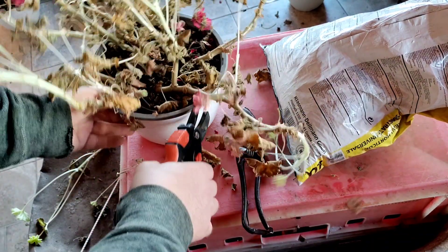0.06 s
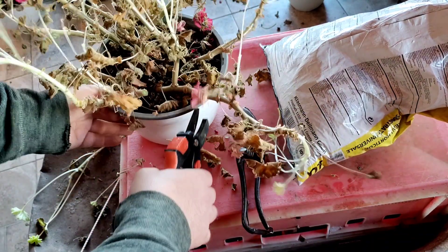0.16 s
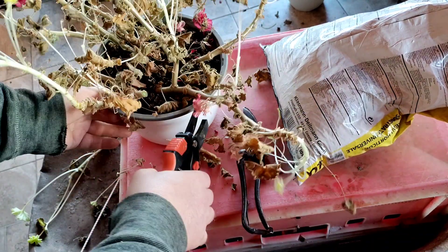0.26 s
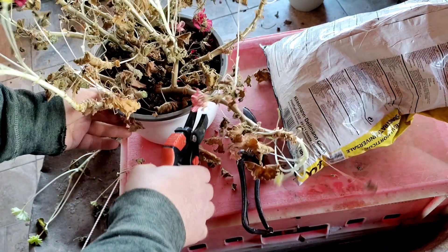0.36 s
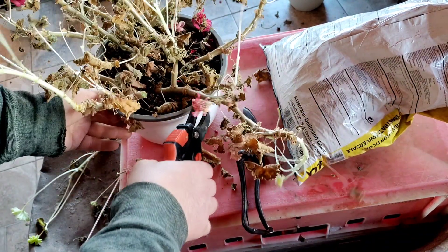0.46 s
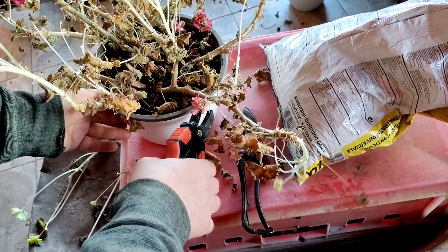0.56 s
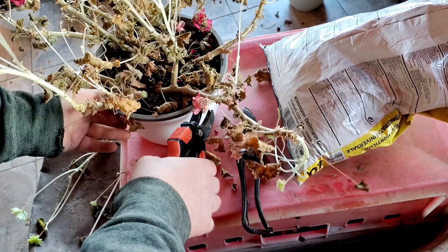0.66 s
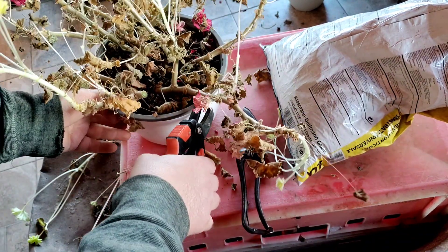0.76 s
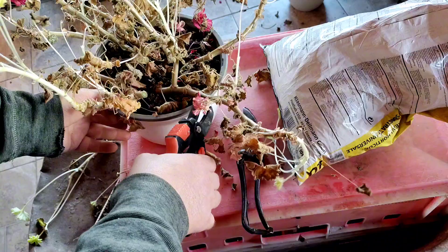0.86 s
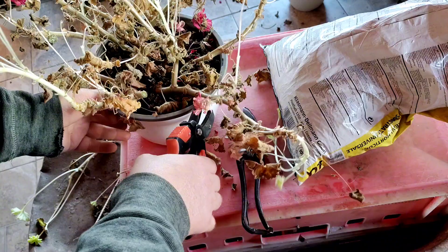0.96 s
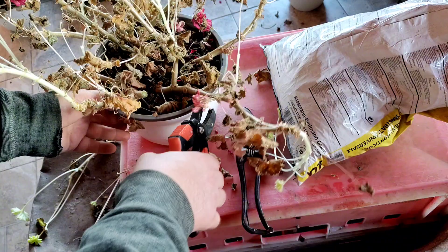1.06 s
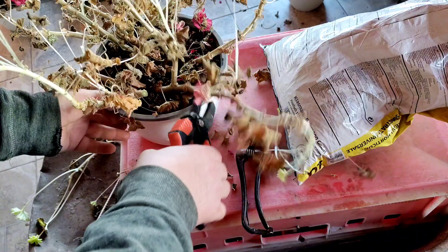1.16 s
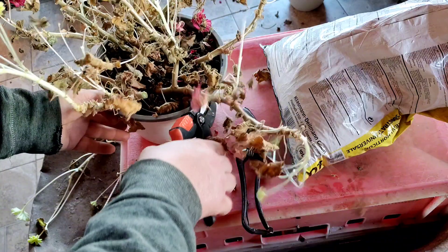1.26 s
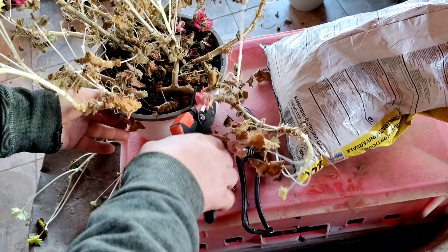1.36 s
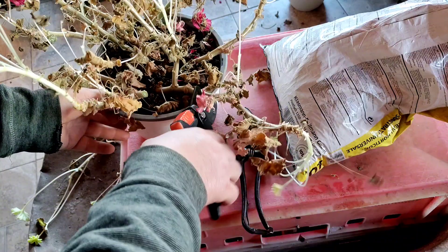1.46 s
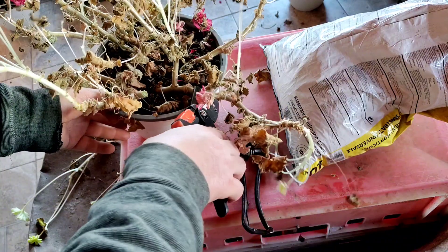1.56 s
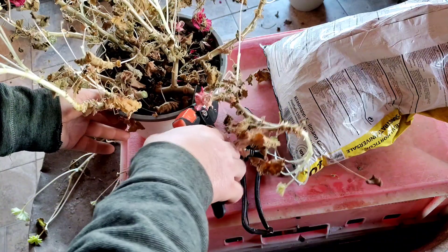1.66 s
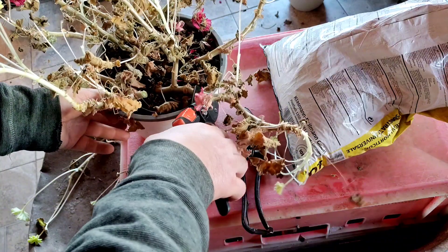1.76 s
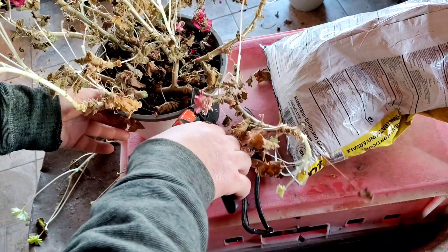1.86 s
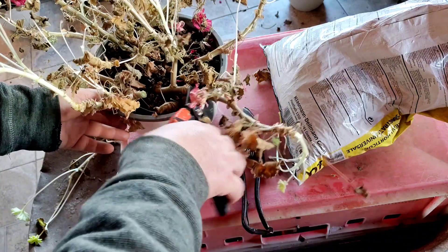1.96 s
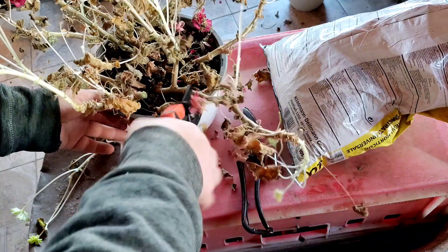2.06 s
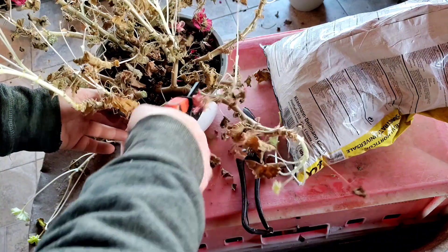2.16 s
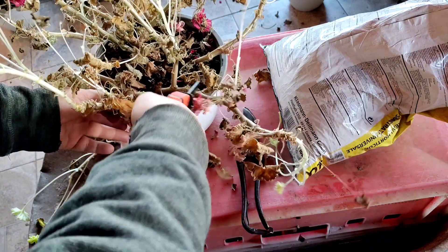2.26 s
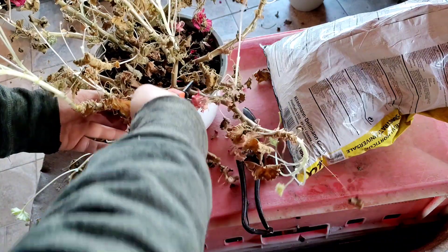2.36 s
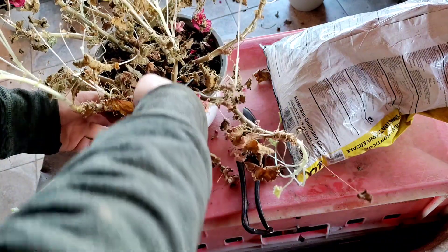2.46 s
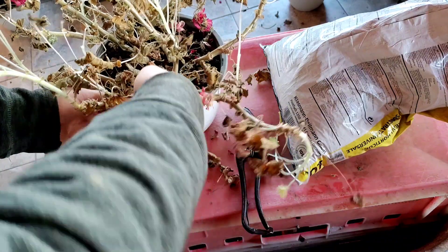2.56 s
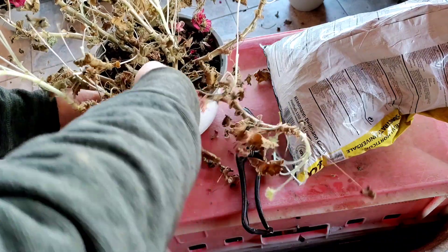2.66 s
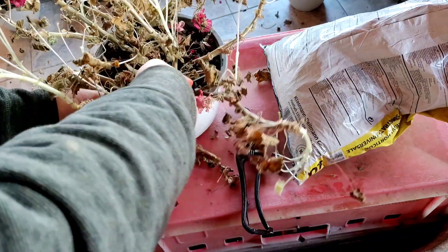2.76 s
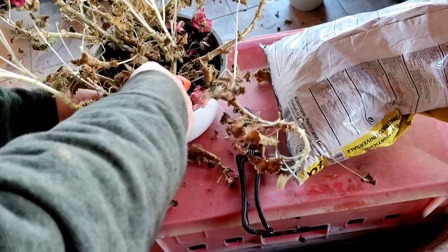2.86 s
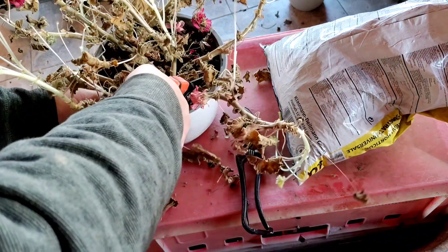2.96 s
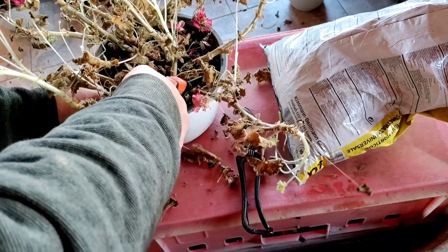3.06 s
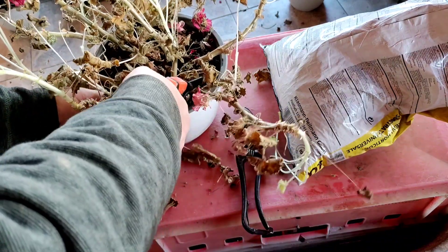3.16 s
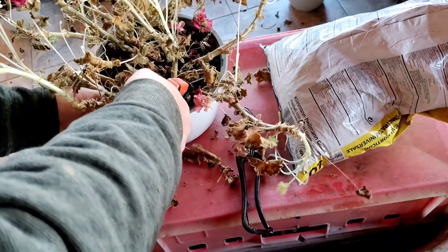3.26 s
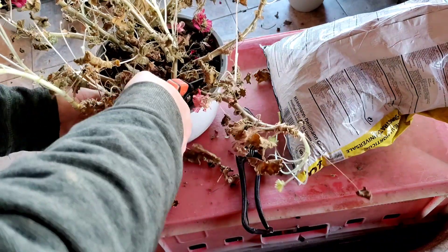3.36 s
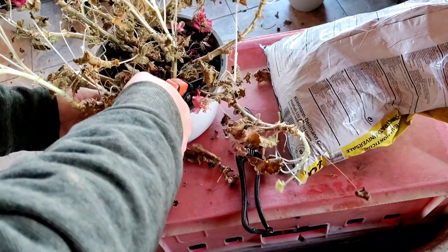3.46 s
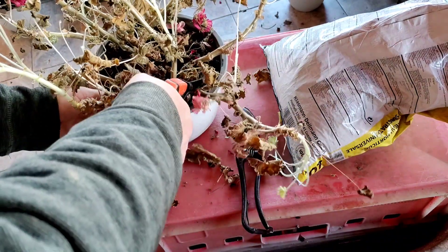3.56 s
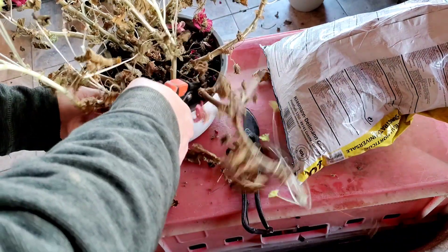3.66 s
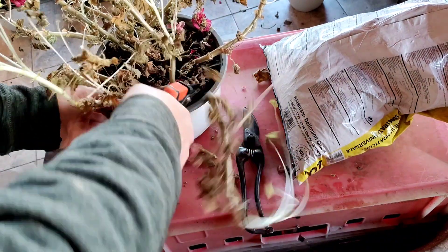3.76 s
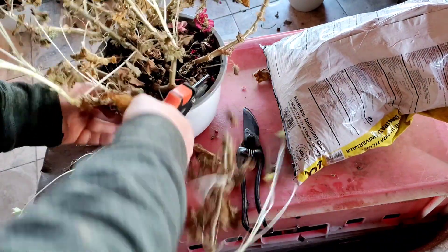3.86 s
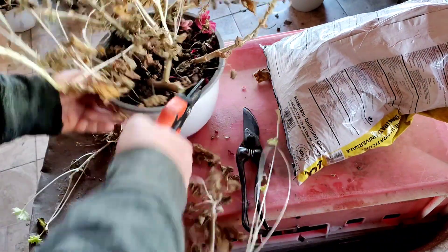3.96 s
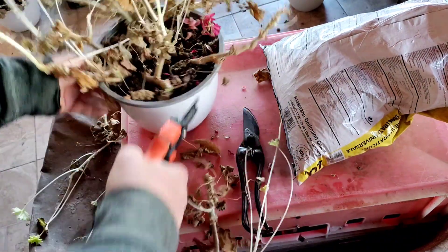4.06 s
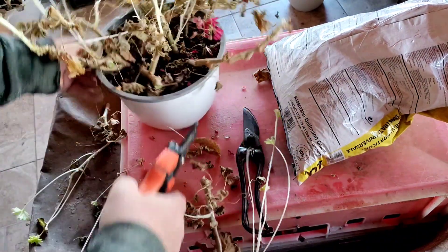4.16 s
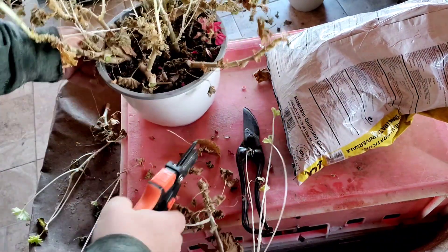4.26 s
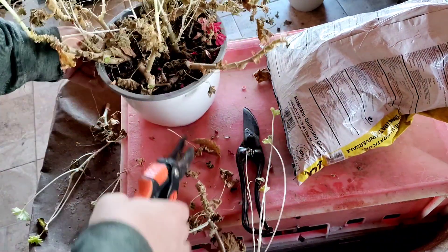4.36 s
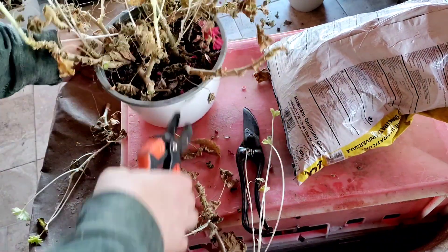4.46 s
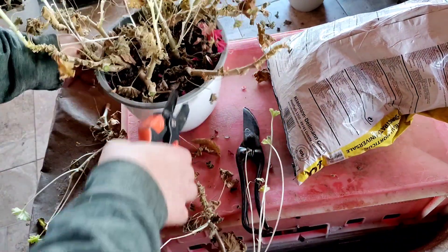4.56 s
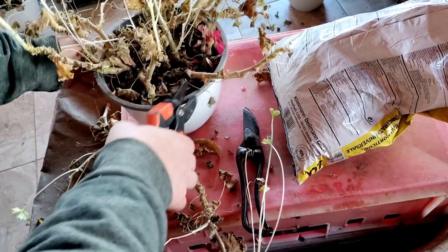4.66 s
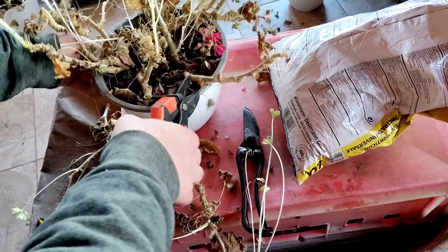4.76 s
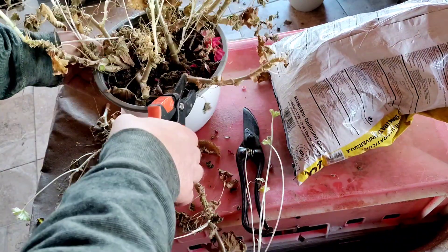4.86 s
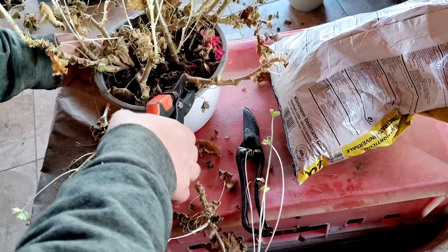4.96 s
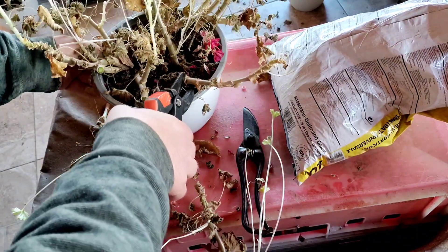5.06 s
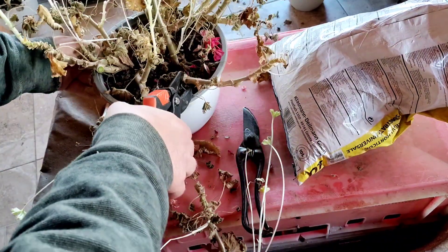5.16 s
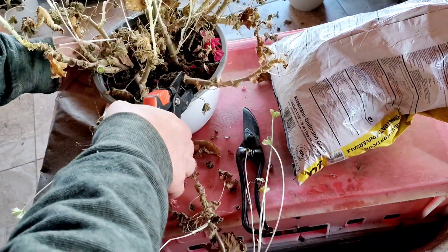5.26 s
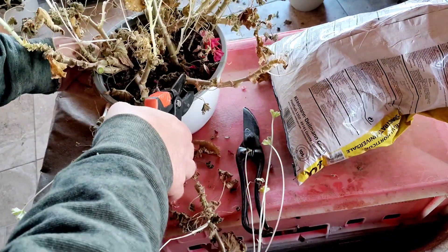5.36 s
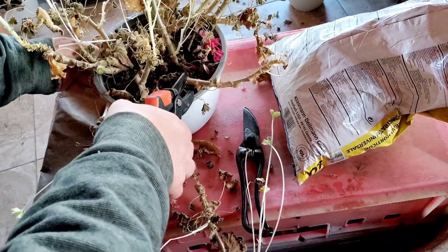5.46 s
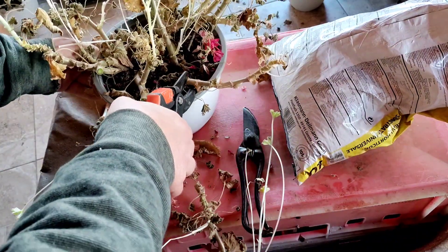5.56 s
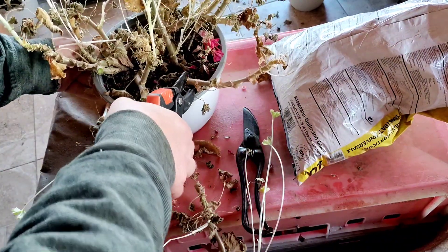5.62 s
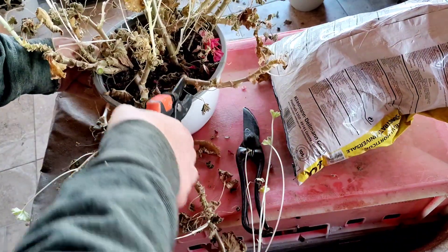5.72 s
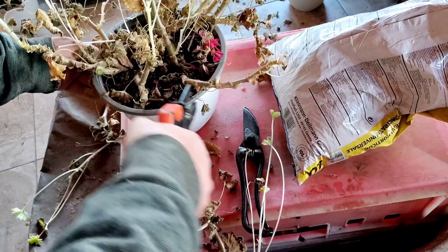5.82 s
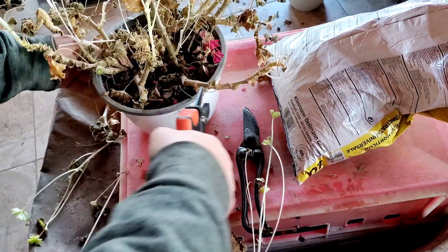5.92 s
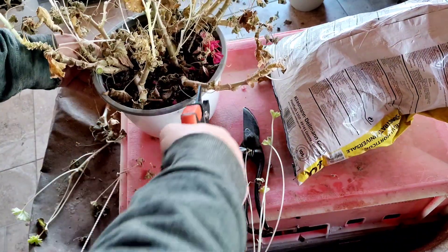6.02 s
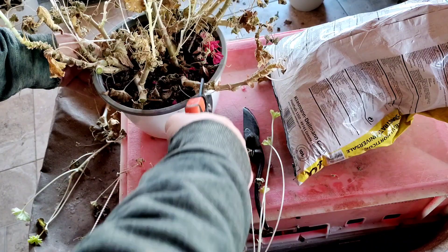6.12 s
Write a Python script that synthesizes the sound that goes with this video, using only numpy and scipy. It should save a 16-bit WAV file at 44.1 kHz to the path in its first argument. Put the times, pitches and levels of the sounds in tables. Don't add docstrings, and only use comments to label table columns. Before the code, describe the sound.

Hand shears cut a dried pot plant. Low knocks boom through the plastic crate beneath, first lightly, then with crisp crackles and brittle foliage. The loudest moment is a sharp steel-and-stem crack followed by dense papery rustle and deep bumps, fading to a few small thumps. Echoing sparrow whistles, faint motor hum and town rumble fill the gaps; the phone's noise reduction roughens the rustle slightly.

```python
import sys
import numpy as np
from scipy import signal
from scipy.fft import rfft, irfft, next_fast_len
from scipy.io import wavfile
from scipy.ndimage import uniform_filter1d

SR = 44100
rng = np.random.default_rng(int(sys.argv[2]) if len(sys.argv) > 2 else 0)


def gain_from_db(level_db):
    decades = np.asarray(level_db, float) / 20
    return 10 ** decades


def put_to_file(sound):
    columns = np.atleast_2d(sound).T
    safe = np.clip(columns, -1, 1)
    whole_steps = np.round(safe * 32767)
    wavfile.write(sys.argv[1], SR, whole_steps.astype(np.int16))


N = 272979

# [t/s, boom peak level/dB, boom f/Hz, dull crack over boom/dB, sharp crack over boom/dB]
KNOCKS = [(1.31, -27, 190.7, -10, -15), (1.669, -30.5, 188.6, -13, -12), (2.01, -35.5, 193.3, -12.5, -12),
          (2.144, -32, 178.7, -14.5, -4.5), (2.361, -62, 196, 3.5, 1.5), (2.524, -18.5, 190.6, -42, -47),
          (2.603, -37.5, 184, -26, -16), (2.689, -31, 190, -25.5, -38), (3.755, -21.5, 195.5, -24, -6.5),
          (3.914, -31, 187.3, -8.5, -6.5), (4.112, -18.5, 280.5, -14, -45), (4.123, -15, 184.4, -19.5, -34),
          (4.145, -30, 141.4, -34, -45), (4.174, -29, 183.6, -34, -39), (4.581, -30, 184.6, -37, -52.5),
          (4.6, -33, 192, -35, -50), (4.693, -27.5, 161, -35, -46), (4.74, -24.5, 162, -8.5, -39),
          (4.907, -37.5, 179, -17, -49), (5.025, -27.5, 176, -27, -35), (5.431, -35.5, 184.3, -51, -53)]
# [t/s, boom peak level/dB, boom f/Hz]
JUDDER = [
    (0.064, -33, 150.4),
    (0.089, -30, 124),
    (0.114, -26.5, 125),
    (0.138, -32.5, 125),
    (0.17, -25.5, 158),
    (0.19, -26.5, 186),
]
JUDDER_T60_S, JUDDER_DULL_DB, JUDDER_SHARP_DB = 0.33, -52, -52
BOOM_T60_S, MOVED_S, MOVED_T60_S = 0.19, 4.0, 0.09
HOLD_S, HOLD_DROP_DB = .043, -6
# [multiple of boom f, level/dB, share of boom t60]
CRATE_MODES = [(1, 3, 1.1), (1.132, -1.5, 0.45), (0.802, -16.5, 4.7), (1.499, -4.5, 0.41),
               (2.25, -9.5, 0.43), (2.9, -14, 0.42), (3.9, -19, 0.29)]
BLADES_S, BLADES_DB = 3.7556, -12
# [t/s, peak level/dB, centre f/Hz, t60/s]
SNAPS = [(1.321, -39, 7500, 0.03), (1.4807, -56, 7200, 0.03), (1.502, -49.5, 7650, 0.043),
         (1.5214, -49, 7750, 0.04), (1.5942, -57, 7500, 0.04), (1.611, -53.5, 7840, 0.04),
         (1.6324, -45.5, 7450, 0.05), (1.757, -42.5, 7850, 0.088), (1.771, -39.5, 8400, 0.062),
         (1.8027, -48, 7850, 0.036), (1.9022, -36, 8700, 0.057), (1.9245, -37.5, 4500, 0.16),
         (1.9602, -35, 8200, 0.05), (1.9982, -34, 3470, 0.023), (2.0357, -46, 11300, 0.02),
         (2.0553, -32, 8160, 0.034), (2.07, -38, 8010, 0.036), (2.154, -50, 3000, 0.018),
         (2.4348, -48, 7240, 0.11), (2.529, -55, 7500, 0.079), (3.636, -56.5, 8000, 0.017),
         (3.6576, -48, 4450, 0.048), (3.689, -43.5, 7270, 0.029), (3.708, -33, 7000, 0.08),
         (3.7284, -31, 7350, 0.088), (3.7507, -15.5, 4405, 0.0066), (3.973, -37, 4600, 0.08),
         (3.995, -31.5, 9000, 0.03), (4.0075, -20.5, 6200, 0.014), (4.037, -27, 4500, 0.015),
         (4.026, -28, 5200, 0.15), (4.0536, -24, 4300, 0.06), (4.066, -38, 3000, 0.04),
         (4.103, -29.5, 4740, 0.13), (4.223, -37, 7560, 0.05), (4.334, -49, 13000, 0.02),
         (4.3428, -31.5, 7650, 0.02), (4.352, -46, 12500, 0.03), (4.4636, -41, 5000, 0.08),
         (4.4756, -38, 7500, 0.03), (4.739, -30.5, 3960, 0.022), (5.431, -55.5, 687, 0.15)]
TICK, TICK_S = .45, .003
# [peak t/s, rise/s, peak level/dB, t60/s]
BRUSHES = [(.022, 0.033, -58.5, 0.091), (.17, 0.42, -57, 0.26), (1.329, 0.044, -54, 0.47),
           (1.519, 0.087, -58.5, 0.31), (1.613, 0.091, -56, 0.65), (1.779, 0.091, -52.5, 1.4),
           (1.927, 0.048, -47.5, 0.97), (2.056, 0.012, -47.5, 0.21), (2.13, 0.22, -59, 0.24),
           (2.775, 0.16, -63.5, 0.3), (3.634, 0.0083, -67, 0.4), (3.698, 0.11, -60.5, .3),
           (3.71, .01, -43, 0.44), (3.752, .02, -38.5, 0.22), (3.972, .015, -42, 1.3),
           (4.009, 0.036, -35.5, 0.41), (4.04, 0.05, -43.5, 0.36), (4.1, 0.35, -41, 0.17),
           (4.17, .05, -58, 0.68), (4.225, 0.01, -51.5, 0.29), (4.34, 0.015, -50.5, 0.47),
           (4.472, 0.023, -58.5, 2.4), (3.85, .08, -58.5, 0.44), (4.75, 0.33, -64, .6)]
# [t/s, twiggy level/dB, woody level/dB, t60/s]
JOLTS = [(1.31, -58.5, -46.5, 0.47), (1.672, -66, -53, 0.31), (2.053, -65, -58, 0.62),
         (2.147, -60, -48, 0.46), (2.358, -79, -62.5, 0.41), (2.433, -72, -71, 0.44),
         (2.527, -55, -44, 0.58), (2.69, -64.5, -57.5, 0.47), (3.708, -50, -44, 0.79),
         (3.754, -50, -37.5, 0.16), (3.918, -56.5, -45, 0.15), (4.112, -51, -36, 0.67),
         (4.343, -62.5, -54.5, 0.64), (4.462, -59, -85, 0.63), (4.739, -49, -42, 0.29),
         (5.028, -70, -53.5, 0.36), (5.43, -107, -72.5, 0.33)]
JOLT_RISE_S, CLATTER_DB, CLATTER_T60_S = .003, 3, 0.13
# [peak t/s, rise/s, twiggy level/dB, woody level/dB, t60/s]
RUBS = [(0.173, 0.39, -60.5, -46.5, 0.36), (1.779, 0.29, -62, -64.5, 0.58),
        (1.927, 0.085, -58.5, -66, 0.58), (2.005, 0.061, -61, -47.5, 0.21), (2.76, 0.24, -63.5, -60, 0.73),
        (3.698, 0.14, -72.5, -63.5, 0.26), (3.965, .02, -56, -56, .3), (4.008, 0.091, -46, -44.5, 0.34),
        (4.07, 0.14, -44, -44.5, 0.28), (1.46, 0.073, -80, -60, 0.37), (4.7, 0.19, -63.5, -50, 0.36),
        (4.77, 0.04, -56.5, -51, 0.4), (4.62, 0.12, -62.5, -79, 0.45), (4.854, 0.12, -65.5, -50.5, 0.53)]
# [f/Hz, level per Hz/dB]
LEAF = [(2350, -54), (4000, -0.5), (4820, -6), (7480, -6.5), (9320, -9), (15400, -10)]
# [f/Hz, level per Hz/dB]
TWIG = [(1500, -27), (2200, -4), (3100, 0.5), (3900, -4), (4500, -17), (5800, -32.5)]
# [f/Hz, level per Hz/dB]
WOOD = [(250, -10.5), (420, -5.5), (800, -8), (1500, -5.5), (2000, -8), (2500, -14.5), (3300, -50)]
# [peak t/s, rise/s, level/dB, t60/s]
SWISH = [
    (.04, .1, -62.5, .4),
    (.15, 0.33, -56.5, 1),
    (.3, 0.55, -62, 0.35),
    (2.434, 0.0053, -55.5, 0.35),
    (2.54, 0.014, -65.5, 0.53),
    (2.773, 0.19, -61, 0.36),
    (4.745, 0.009, -61, 0.43),
]
# [f/Hz, level per Hz/dB]
SWISH_COLOUR = [(2500, -8), (4500, -10.5), (7000, -5.5), (10000, -7), (13000, -21), (16000, -8)]
# [f/Hz, t60/s]
YARD = [(150, 0.12), (600, 0.32), (2000, 0.4), (5000, 0.14), (12000, 0.31)]
YARD_DB = -10.5
# [t/s, high f/Hz, high level/dB, low f/Hz, low level/dB]
SPARROW_CALLS = [
    (0.741, 4320, -59, 3890, -68),
    (2.294, 4220, -64, 3830, -65.5),
    (2.41, 4330, -65, 3607, -60.5),
    (1.551, 4240, -70, 3750, -66),
    (3.047, 4260, -68, 3500, -62),
    (3.28, 4220, -63, 3300, -82),
    (5.007, 4205, -59, 3690, -58.5),
    (5.688, 4420, -68, 4030, -69.5),
    (5.746, 3520, -62, 3120, -60),
]
HIGH_S, HIGH_FALL, LOW_AFTER_S, LOW_S, LOW_FALL = 0.04, 0.039, 0.035, .06, 0.23
# [t/s, length/s, start f/Hz, end f/Hz, level/dB]
STRAYS = [(0.202, 0.15, 2330, 2134, -62.5), (.797, 0.045, 3690, 3680, -70), (.9, 0.029, 3670, 3700, -80),
          (.96, 0.042, 4080, 4000, -77), (.985, 0.052, 3630, 3720, -78.5), (3.268, .07, 4590, 4350, -73),
          (3.305, 0.079, 2860, 2690, -68), (5.02, 0.029, 4740, 4500, -62), (5.07, 0.052, 3250, 2850, -66.5),
          (5.455, 0.038, 2150, 2230, -79), (5.685, 0.021, 4750, 4700, -69.5),
          (5.692, 0.019, 3960, 3910, -61), (5.8, .07, 3150, 2900, -67), (.748, .03, 4350, 3960, -62),
          (6.035, 0.048, 608, 500, -62), (6.072, 0.025, 1150, 1120, -70)]
FAR_T60_S = 0.58
# [t/s, level/dB]
RUMBLE = [(0.0, -52.5), (0.07, -50.5), (0.43, -61.5), (0.83, -61.5), (1.36, -56), (1.86, -60),
          (2.79, -53.5), (2.91, -55.5), (3.36, -54.5), (3.68, -51.5), (4.0, -49.5), (4.3, -44.5),
          (4.5, -52), (4.72, -46), (5.77, -59.5), (6.19, -59.5)]
# [f/Hz, level per Hz/dB]
CRATE = [(62, -60.5), (105, -19), (150, 2.5), (205, 2), (274, -5.5), (405, -28), (700, -52), (1000, -85)]
AFTER_DB, AFTER_T60_S = -21, 0.58
# [f/Hz, level per Hz/dB]
TOWN = [(12, -46.5), (20, -6.5), (43, -13.5), (62, -12.5), (80, 4), (97, -4), (110, -5), (140, -45.5),
        (240, -120)]
TOWN_DB = -62
# [peak t/s, rise/s, level/dB, t60/s]
HUMS = [(.3, 0.31, -63, 0.96), (.7, 0.34, -78, 0.27), (1.13, 0.28, -79, 1.1), (1.6, 0.12, -70, 1.3),
        (2.05, 0.3, -77, 0.9), (2.6, 0.15, -61, .8), (3.25, 0.32, -91, 0.87), (3.46, 0.18, -67, 0.31),
        (3.8, 0.16, -67.5, 1.6), (4.25, 1.5, -60, 1.7), (4.8, 0.45, -62.5, 1.14), (5.65, 0.66, -75.5, 0.26),
        (6.06, 0.25, -81, 0.65)]
# [f/Hz, level per Hz/dB]
HISS = [(350, -25), (600, -6), (812, -5), (1370, -6), (2240, -7.5), (3250, -9), (14100, -15), (16000, -37)]
HISS_DB = -78.5
DIP_S, DIP_HALF_WIDTH_S, DIP_DB = .668, 0.016, -9
# [f/Hz, correlation]
LIKENESS = [(40, 0.88), (130, 0.94), (290, 0.85), (640, 0.17), (1400, 0.0045), (3000, 0.041)]
# [f/Hz, left over right level/dB]
PORTS = [(60, 1.5), (130, -1), (290, 0), (640, 1.5), (1410, -1.5), (3100, -5), (6820, 10.5), (15000, 1)]
PORT_LAG = 5


def knocks():
    boom, crack = np.zeros((1, N)), np.zeros((1, N))
    t = np.arange(SR // 2) / SR
    luck = rng.standard_normal((len(blows()), len(CRATE_MODES), 2))
    grit = rng.standard_normal((len(blows()), SR // 2))
    dull = signal.butter(2, [400, 2000], "band", fs=SR, output="sos")
    sharp = signal.butter(3, [1900, 3900], "band", fs=SR, output="sos")
    swing = (1 - np.exp(-t / 0.0023)) * gain_from_db(HOLD_DROP_DB / (1 + np.exp((HOLD_S - t) / 0.0019)))
    for (s, db, hz, t60, dull_db, sharp_db), chance, noise in zip(blows(), luck, grit):
        ringing = 0
        for (multiple, mode_db, share), (level_luck, pitch_luck) in zip(CRATE_MODES, chance):
            decay = gain_from_db(mode_db + 2 * level_luck - 60 * t / (share * np.clip(t60, .03, .4)))
            mode_hz = hz * multiple * (1 + 0.01 * pitch_luck)
            ringing = ringing + decay * np.sin(2 * np.pi * mode_hz * t)
        ringing = ringing * swing
        add(boom, -gain_from_db(db) * ringing[None] / np.abs(ringing).max(), s)
        contact = noise * (gain_from_db(-60 * t / 0.007) + gain_from_db(-11.5 - 60 * t / 0.17))
        contact[:6] -= 9.0
        for band, over_db in ((dull, dull_db + 15.0), (sharp, sharp_db + 12.0)):
            part = signal.sosfilt(band, contact)
            add(crack, gain_from_db(db + over_db) * part[None] / np.abs(part).max(), s)
    return signal.sosfilt(signal.butter(4, 100, "high", fs=SR, output="sos"), boom), crack


def blows():
    judder = [(s, db, hz, JUDDER_T60_S, JUDDER_DULL_DB, JUDDER_SHARP_DB) for s, db, hz in JUDDER]
    bumps = [(s, db, hz, BOOM_T60_S if s < MOVED_S else MOVED_T60_S, *cracks)
             for s, db, hz, *cracks in KNOCKS]
    return judder + bumps


def blades():
    out, t = np.zeros((1, N)), np.arange(SR // 100) / SR
    pulse = -np.sin(2 * np.pi * 1500 * t) * np.exp(-t / .00035)
    add(out, gain_from_db(BLADES_DB) * pulse[None] / np.abs(pulse).max(), BLADES_S)
    return out


def snaps():
    out, t = np.zeros((2, N)), np.arange(SR // 5) / SR
    grit = rng.standard_normal((len(SNAPS), 3, len(t)))
    for (s, db, hz, t60), noise in zip(SNAPS, grit):
        pair = noise[0] + 3.6 * noise[1:]
        low, high = hz / 3.4, min(hz * 2, .45 * SR)
        tear = rms_one(signal.sosfilt(signal.butter(3, [low, high], "band", fs=SR, output="sos"), pair))
        tick = TICK * (high / SR * 2) ** 2 * np.diff(pair, prepend=0) * np.exp(-t / TICK_S)
        decay = gain_from_db(-60 * t / np.clip(t60, .005, .2))
        add(out, gain_from_db(db - 7.0) * (tear + tick) * decay, s)
    return out


def leaves():
    papery = coloured(crackle(1800, spread_db=3.5, clump_db=1.5, apart=2.7), LEAF)
    twiggy = coloured(crackle(2700, spread_db=2.0, clump_db=0.5, apart=1.0), TWIG)
    woody = coloured(crackle(1500, spread_db=1.0, clump_db=1.0, apart=0.7), WOOD)
    brushed = gain_from_db(-0.5) * swells(BRUSHES) * papery
    return brushed + gain_from_db(4) * stems(0) * twiggy + gain_from_db(-1.0) * stems(1) * woody


def crackle(per_s, spread_db, clump_db, apart):
    born = rng.random((3, N)) < per_s / SR
    sizes = gain_from_db(spread_db * np.minimum(rng.exponential(1, (3, N)), 4))
    sizes = sizes * rng.choice([-1, 1], (3, N))
    grains = rms_one(born * sizes) + 0.67 * rng.standard_normal((3, N))
    return rms_one(grains[0] + apart * grains[1:]) * gain_from_db(clump_db * drift(35))


def stems(layer):
    rubs = [(s, rise, dbs[layer], t60) for s, rise, *dbs, t60 in RUBS]
    rattles = [(s, JOLT_RISE_S, dbs[layer], t60) for s, *dbs, t60 in JOLTS]
    clatter = [(s, JOLT_RISE_S, dbs[layer] + CLATTER_DB, CLATTER_T60_S) for s, *dbs, _ in JOLTS]
    return swells(rubs + rattles + clatter)


def swish():
    return swells(SWISH) * wide_noise(SWISH_COLOUR)


def echoes(x, t60_table, build_s):
    t = np.arange(SR) / SR
    white, tail = rng.standard_normal((2, SR)), 0
    for low in 80 * 2. ** np.arange(8):
        band = signal.sosfilt(signal.butter(2, [low, 2 * low], "band", fs=SR, output="sos"), white)
        decay = gain_from_db(-60 * t / at_hz(t60_table, low * 1.12))
        tail = tail + band * decay * (1 - np.exp(-t / build_s))
    tail /= np.sqrt(np.sum(tail ** 2, axis=1, keepdims=True))
    return signal.fftconvolve(np.broadcast_to(x, (2, N)), tail, axes=1)[:, :N]


def sparrows():
    out, waver = np.zeros((1, N)), drift(160)
    for s, length, from_hz, to_hz, db in notes():
        part = np.arange(round(length * SR)) / (length * SR)
        warble = 1 + .028 * waver[int(s * SR):][:len(part)]
        hz = (from_hz + (to_hz - from_hz) * part) * warble
        breath = np.sin(np.pi * np.sqrt(part))
        whistle = breath * np.sin(2 * np.pi * np.cumsum(hz) / SR)
        add(out, gain_from_db(db + 2.5) * whistle[None], s)
    return 0.31 * out + echoes(out, [(1000, FAR_T60_S), (8000, FAR_T60_S * 0.6)], build_s=0.0032)


def notes():
    high = [(s, HIGH_S, hz, hz * (1 - HIGH_FALL), db) for s, hz, db, _, _ in SPARROW_CALLS]
    low = [(s + LOW_AFTER_S, LOW_S, hz, hz * (1 - LOW_FALL), db) for s, _, _, hz, db in SPARROW_CALLS]
    return STRAYS + high + low


def background():
    db, = in_time(RUMBLE)
    lingering = swells([(s + 0.039, .06, top + AFTER_DB, AFTER_T60_S) for s, top, *_ in blows()])
    level = np.hypot(gain_from_db(db), lingering)
    rumble = level * gain_from_db(2.4 * drift(6.2)) * wide_noise(CRATE)
    town = gain_from_db(TOWN_DB - 4.0) * (level / np.median(level)) ** 0.88 * wide_noise(TOWN)
    motor = wide_noise([(400, -47.5), (460, -3.5), (495, -5.0), (535, -9.0), (640, -56.5)])
    hum = swells(HUMS) * motor
    hiss = gain_from_db(HISS_DB) * wide_noise(HISS)
    dip = gain_from_db(DIP_DB * np.exp(-((np.arange(N) / SR - DIP_S) / DIP_HALF_WIDTH_S) ** 2))
    return dip * (rumble + town + hum + hiss)


def wide_noise(spectrum):
    size = next_fast_len(N)
    mid, side = rfft(rng.standard_normal((2, size)))
    alike = np.clip(at_hz(LIKENESS, np.fft.rfftfreq(size, 1 / SR)), -1, 1)
    pair = np.sqrt(1 + alike) * mid + np.sqrt(1 - alike) * side * [[1], [-1]]
    return coloured(irfft(pair, size)[:, :N], spectrum)


def swells(rows):
    t, power = np.arange(0, N + 16, 16) / SR, 0
    for s, rise, db, t60 in rows:
        growing = 30 * (s - t) / max(rise, .002)
        dying = 60 * (t - s) / max(t60, .02)
        power = power + gain_from_db(db - np.maximum(growing, dying)) ** 2
    return np.interp(np.arange(N) / SR, t, np.sqrt(power))


def drift(rate):
    r = np.exp(-80 * np.pi * rate / SR)
    slow = signal.lfilter([1], [1, -2 * r, r * r], rng.standard_normal(N // 40 + 2002))[2000:]
    return np.interp(np.arange(N) / 40, np.arange(len(slow)), rms_one(slow))


def coloured(x, spectrum):
    size = next_fast_len(N)
    gain = gain_from_db(at_hz(spectrum, np.fft.rfftfreq(size, 1 / SR)))
    return rms_one(irfft(rfft(x, size) * gain, size)[..., :N])


def at_hz(points, hz):
    point_hz, value = np.transpose(points)
    return np.interp(np.log(np.maximum(hz, 1)), np.log(point_hz), value)


def in_time(rows):
    s, *columns = np.transpose(rows)
    return [np.interp(np.arange(N) / SR, s, c) for c in columns]


def rms_one(x):
    return x / np.sqrt(np.mean(x ** 2) + 1e-20)


def add(out, x, s):
    i = max(round(s * SR), 0)
    out[:, i:i + x.shape[1]] += x[:, :N - i]


def at_ports(x):
    size = next_fast_len(N)
    hz = np.fft.rfftfreq(size, 1 / SR)
    half_db = at_hz(PORTS, hz) / 2
    tilt = gain_from_db(np.array([half_db, -half_db]))
    late = np.exp(-2j * np.pi * hz * PORT_LAG / SR * np.array([[0], [1]]))
    return irfft(rfft(x, size) * tilt * late, size)[:, :N]


def scene():
    boom, crack = knocks()
    crack = signal.sosfilt(signal.butter(2, 150, "high", fs=SR, output="sos"), crack + blades())
    breaks = snaps()
    struck = crack[0] + breaks.mean(0) + gain_from_db(-0.5) * boom[0]
    wet = gain_from_db(YARD_DB) * echoes(struck, YARD, build_s=0.027)
    near = boom + crack + breaks + leaves() + swish() + wet
    return at_ports(near) + sparrows() + background()


def suppress(x, ripple_db, hole_db, rare, wake_db):
    hz, _, bins = signal.stft(x, SR, nperseg=512)
    hz = hz[:, None]
    instant = np.mean(np.abs(bins) ** 2, axis=0)
    power = uniform_filter1d(instant, size=14, axis=1) + 1e-20
    loud = 10 * np.log10(uniform_filter1d(power[12:].mean(0), size=24))
    awake = np.clip((hz - 800) / 2400, 0, 1) / (1 + np.exp(np.median(loud) + wake_db - loud))
    narrow = uniform_filter1d(power, size=5, axis=0)
    masked = 10 * np.log10(narrow / uniform_filter1d(power, size=51, axis=0))
    broad = uniform_filter1d(instant, size=15, axis=0)
    fresh = 10 * np.log10(broad / uniform_filter1d(power, size=15, axis=0) + 1e-9)
    fresh = np.maximum(fresh, 0)
    field = rng.standard_normal(bins.shape[1:])
    for size, axis in ((2, 0), (2, 0), (14, 1), (3, 1)):
        field = uniform_filter1d(field, size, axis=axis)
    field = rms_one(field)
    spared = field + .11 * masked + .3 * fresh + rare - hz / 20000
    gain_db = awake * (ripple_db * field + hole_db / (1 + np.exp(12 * spared)))
    gain_db -= 25 * (hz > 12900) * (1 - awake) * (field < 1.1)
    broad_db = 10 * np.log10(broad + 1e-20)
    sudden = np.roll(broad_db, -3, axis=1) - broad_db > 11
    gain_db -= 18 * awake * (hz > 4000) * (field < .6) * sudden
    return signal.istft(bins * gain_from_db(gain_db), nperseg=512)[1][:, :N]


def band_limit(x):
    return signal.sosfilt(signal.butter(12, 16660, fs=SR, output="sos"), x)


def record(dry):
    clean = suppress(dry, ripple_db=2.2, hole_db=-30, rare=1.15, wake_db=-6)
    mix = signal.sosfilt(signal.cheby2(10, 50, 16600, fs=SR, output="sos"), clean)
    return band_limit(mix)


dry = scene()
out = record(dry)
put_to_file(out)
```